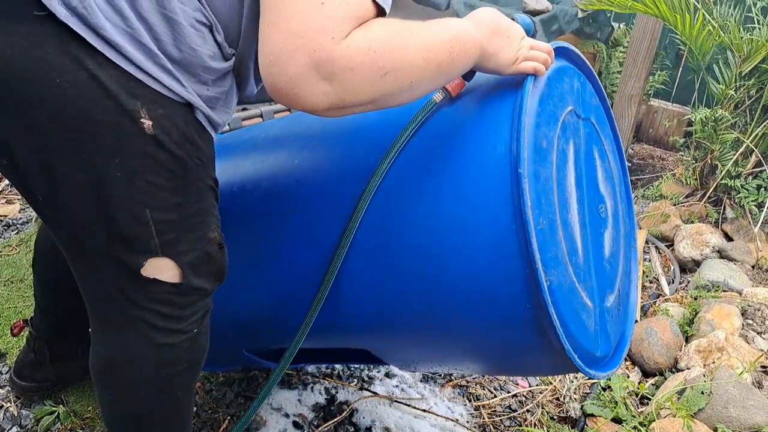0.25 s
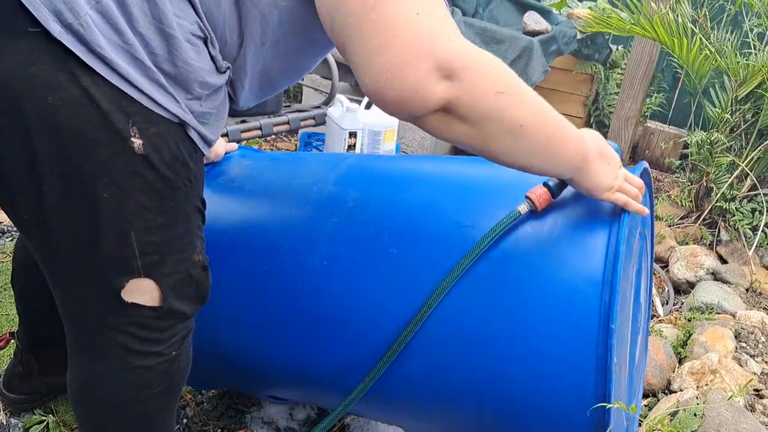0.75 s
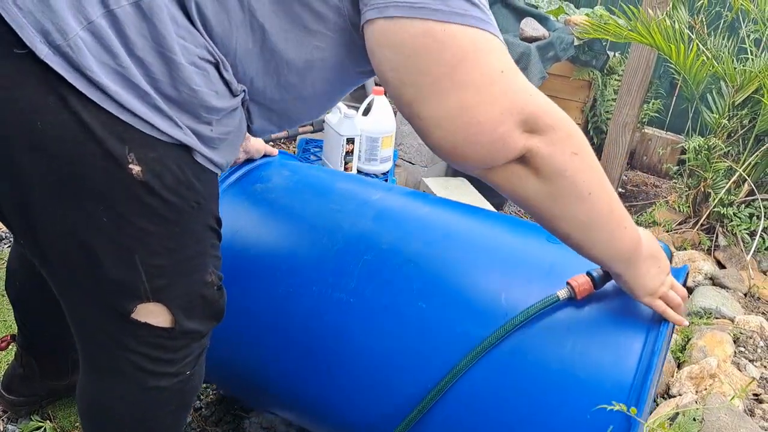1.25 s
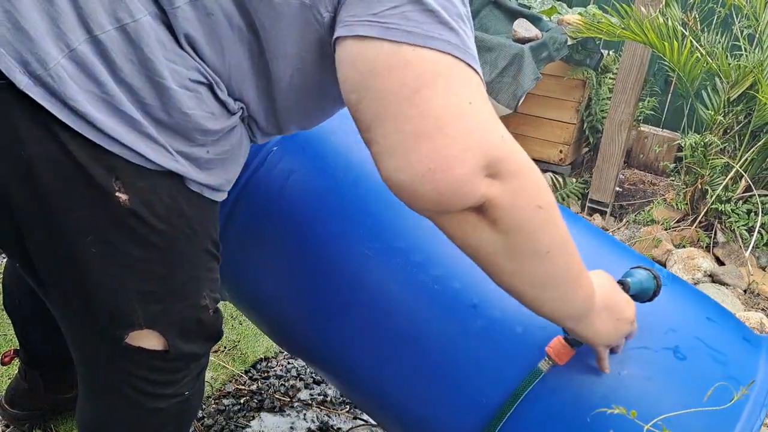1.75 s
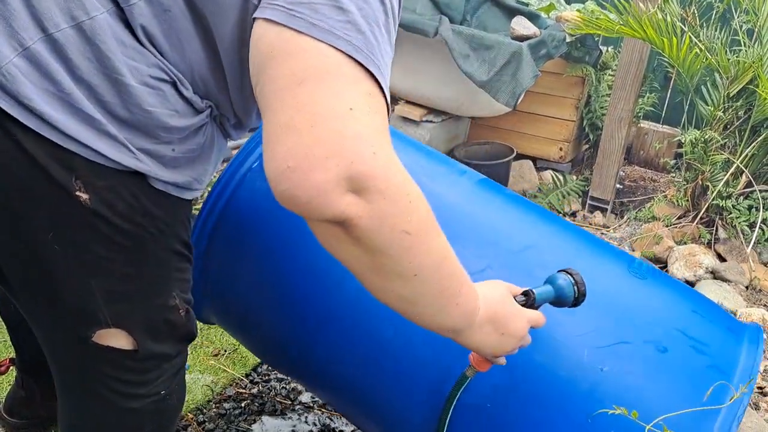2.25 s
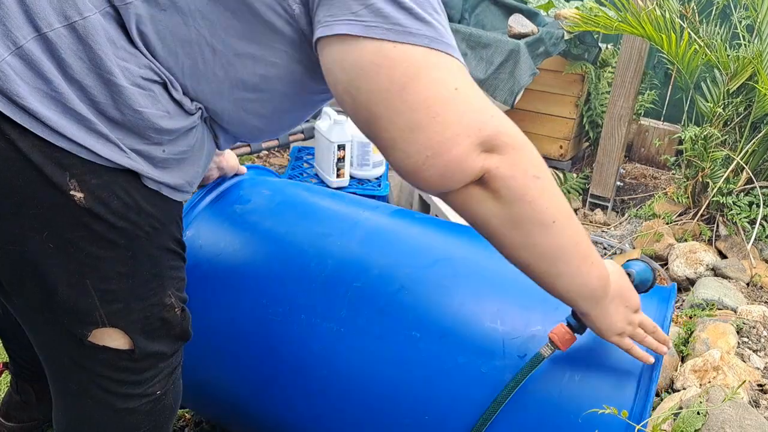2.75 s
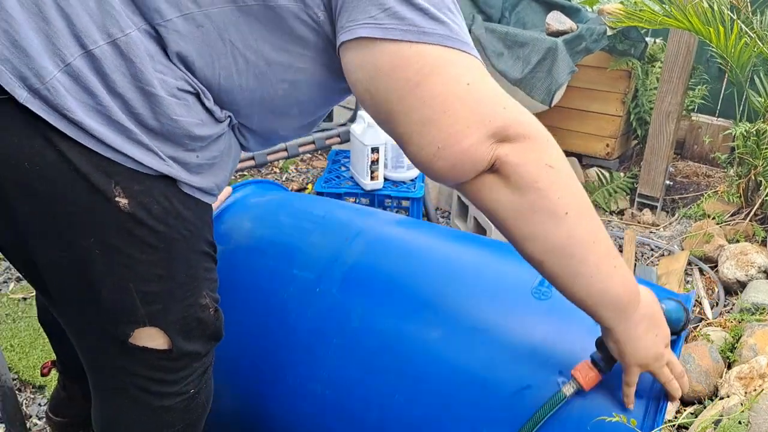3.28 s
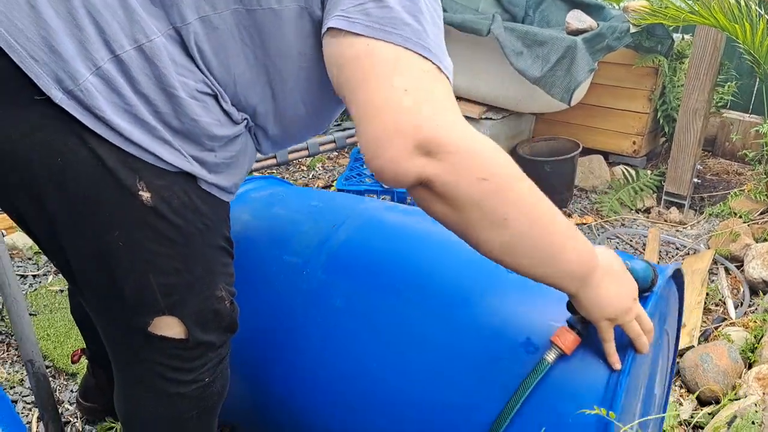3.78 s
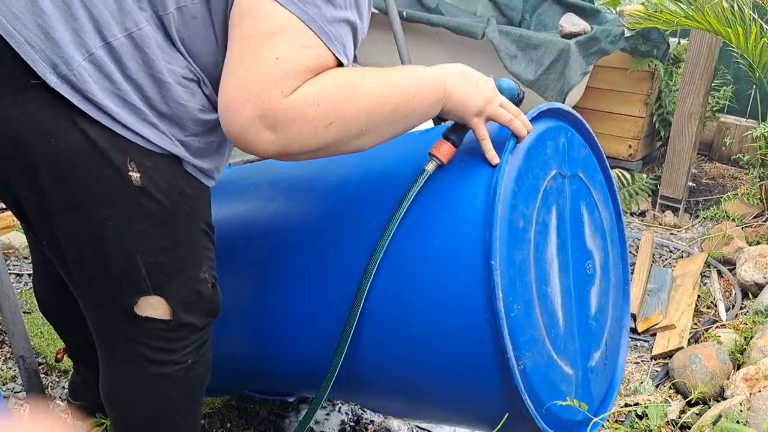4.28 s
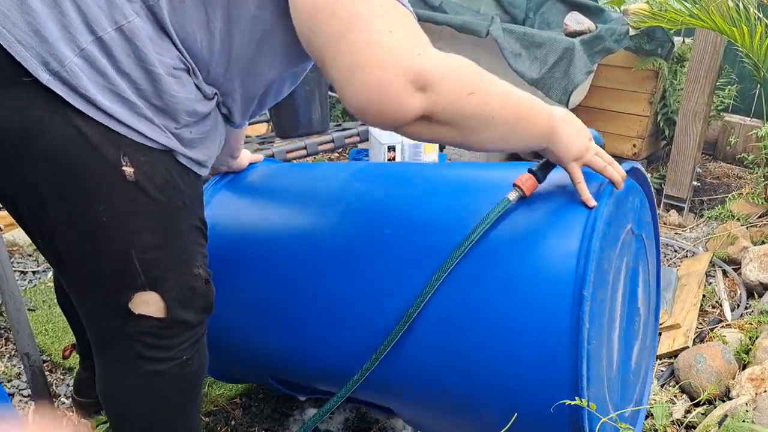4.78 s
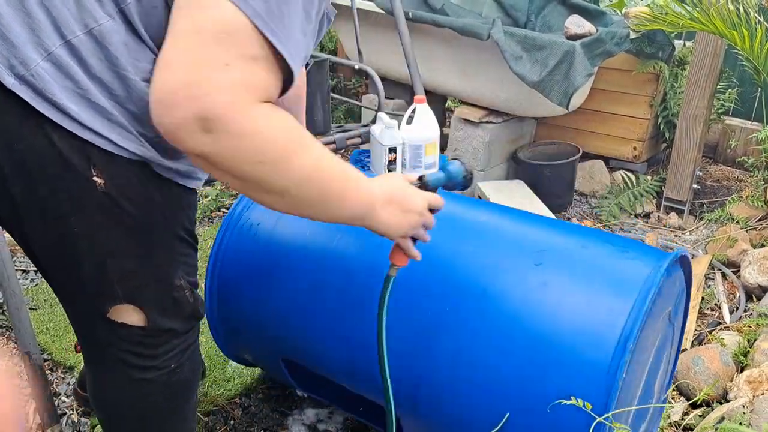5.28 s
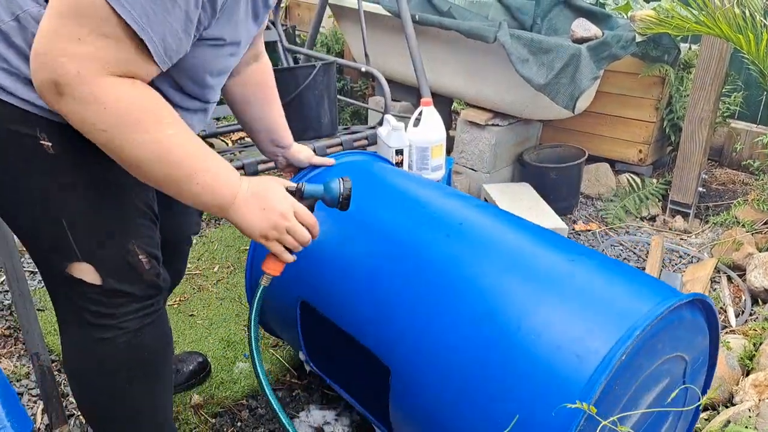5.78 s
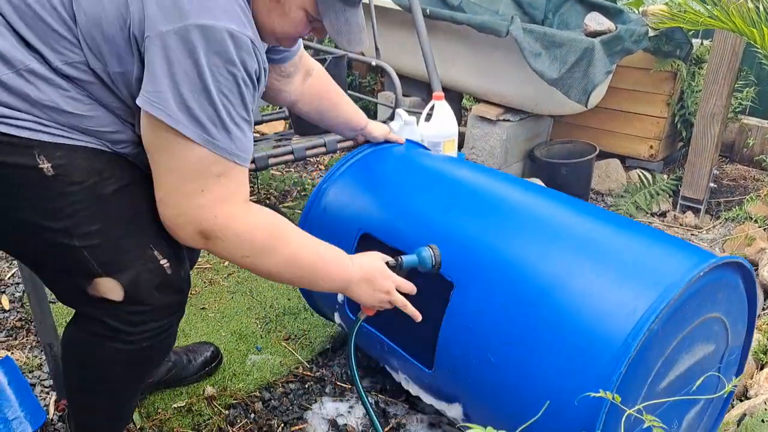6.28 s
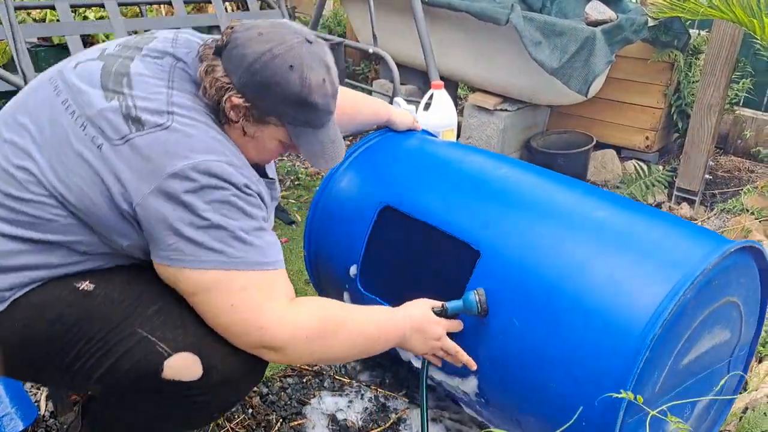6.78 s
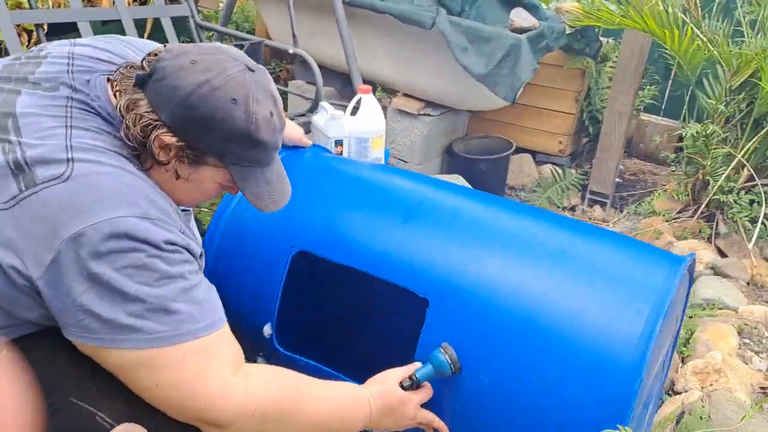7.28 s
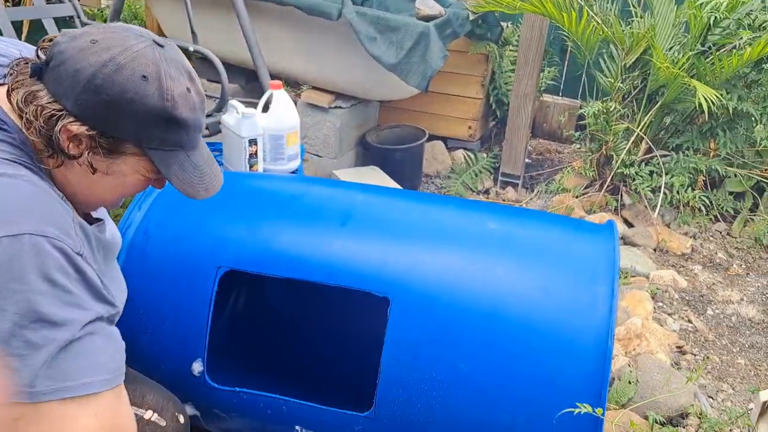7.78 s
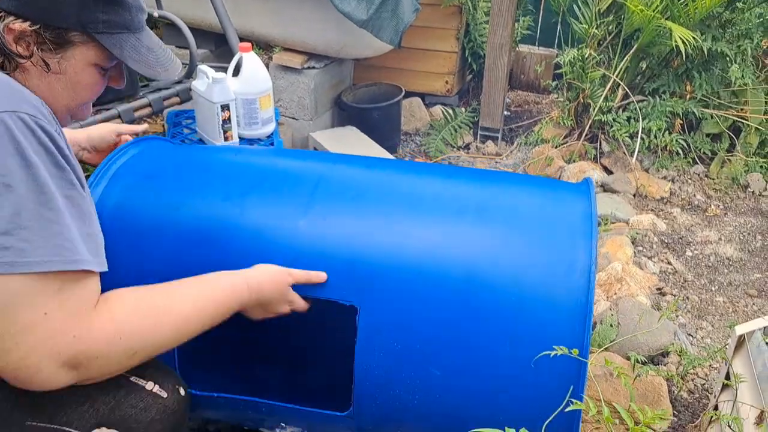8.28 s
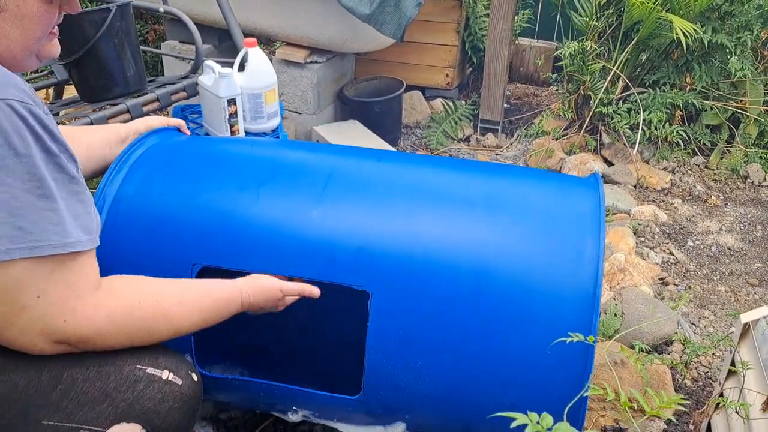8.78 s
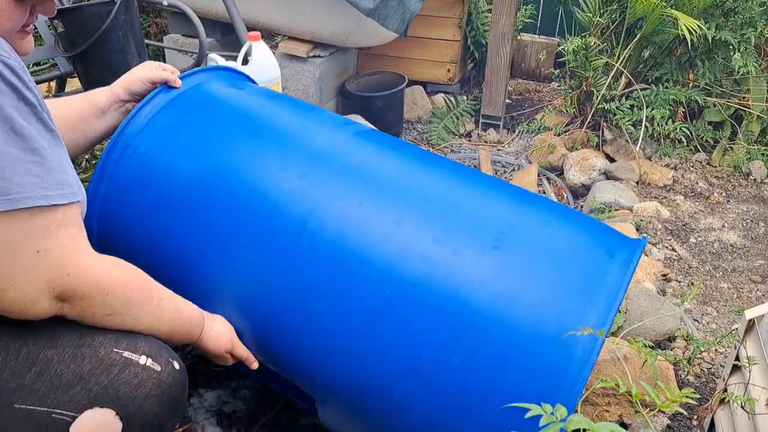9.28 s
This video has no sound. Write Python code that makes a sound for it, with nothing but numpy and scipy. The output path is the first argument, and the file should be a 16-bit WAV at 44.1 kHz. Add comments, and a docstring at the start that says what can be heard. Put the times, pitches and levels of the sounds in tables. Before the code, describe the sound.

Outdoors and close by, water washes around inside a plastic barrel as it is tilted, with deep throbbing booms, hollow knocks and gritty clicks.

```python
"""A big plastic drum with some rinse water in it is rocked and rolled over stony ground in a garden, a metre away.
Its wall and the air inside are paired decaying tones that beat against each other as booms.
Blows by water, hands, rim and hose nozzle are short rattles of noise that ring the hollow shell.
Water is made of tiny impacts, rising bubble tones and gliding notes; grit and clicks are scattered noise.
A faint garden hush lies behind it all."""
import sys
import numpy as np
from scipy import signal
from scipy.fft import rfft, irfft
from scipy.io import wavfile
from scipy.ndimage import uniform_filter1d, minimum_filter1d

SR = 44100
rng = np.random.default_rng(int(sys.argv[2]) if len(sys.argv) > 2 else 0)


def persist_wave(psi):
    """Save psi, clipped to +-1, as 16-bit WAV."""
    counts = np.round(np.clip(psi, -1, 1) * 32767).astype(np.int16)
    wavfile.write(sys.argv[1], SR, np.atleast_2d(counts).T)


N = 420713  # length of the scene in samples

# All table levels are relative, before each sound is mixed.
# the drum drops or the water hits its end: (t/s, level/dB, f/Hz of the air inside)
BOOMS = [(0.161, -27.5, 62.4), (1.199, -1.5, 66.3), (1.461, -7.5, 61.9), (1.823, -24.5, 74.3),
         (3.433, 4, 68), (5.212, -9, 72.5), (5.73, -26.5, 76), (6.429, -31, 79.7), (6.507, -26.5, 79.7),
         (7.564, -29, 79.7), (8.307, -8, 72.8), (8.842, -26, 78.2), (8.989, -18, 78.8), (9.179, -4.5, 75.4)]
# bending modes of the drum that every boom also sets off: (f/Hz, level/dB, t60/s)
BENDING = [(95, -16, 0.38), (128.5, -21, 0.48), (139.8, -24, 0.26)]
# the wall's lowest mode shifts as the drum rolls and the water loads it: (t/s, f/Hz, level against the air/dB)
WALL_MODE = [(0, 55.5, -12), (1.3, 52.5, -3), (3.4, 49.2, -9.5), (5.2, 56.4, -7), (6.5, 56.4, 8.5),
             (8.3, 56.95, 3.5), (9.2, 60.6, -4)]
# resonances of the hollow drum: (f/Hz, level/dB, t60/s)
HOLLOW_MODES = [(98.5, 3.5, 0.49), (134, -12, 0.29), (139.3, 4.5, 0.17), (196, 7.5, 0.39),
                (221.3, 2.5, 0.93), (242, 2.5, 0.39), (301.8, 8.5, 0.13), (328.4, 5, 0.26),
                (378.9, 5.5, 0.25), (426, 6, 0.75), (441, -24, 1), (520, -15, 0.19), (557, 0.5, 0.23),
                (595, -9.5, 0.1), (646.3, 1.5, 0.092), (655, -11, 0.68), (759, 3.5, 0.095),
                (762.4, 2.5, 0.12), (825, -52, 0.75), (881, -6, 1), (1084, 1, 0.21), (1173, -5, 0.073),
                (1310, 1.5, 0.18), (1440, 4, 0.6)]
# dull answer of the damped plastic wall: (f/Hz, level/dB)
WALL_COLOUR = [(70, -14), (140, 13.0), (400, -1.5), (780, 12.5), (920, -5.5), (2500, -52), (8000, -80)]
# blows of water and hands on the shell:
# (t/s, level/dB, thud f/Hz, crack level/dB, top of the crack f/Hz, decay time of the rattle/s)
KNOCKS = [(0.157, -26.5, 330, -16, 7000, 0.039), (0.416, -31, 438, -15, 5300, 0.028),
          (0.597, -29.5, 766, -15.5, 7000, 0.049), (1.195, -10, 425, -16.5, 1510, 0.036),
          (1.455, -6, 765, -12.5, 7000, 0.018), (1.463, -5, 606, -7, 12000, 0.023),
          (1.474, -8.5, 313, -17, 3000, 0.03), (1.53, -21.5, 303, -4, 2500, 0.042),
          (1.82, -31.5, 473, -14.5, 8900, 0.02), (2.756, -34, 590, -11, 5000, .012),
          (2.832, -26.5, 326, -10, 5000, 0.045), (3.357, -23.5, 660, -2.5, 5230, 0.014),
          (3.427, -12, 353, -24, 6000, 0.05), (3.488, -15, 436, -17, 6100, 0.042),
          (3.643, -28, 420, -15, 9000, 0.047), (3.841, -26, 440, -5.5, 9000, 0.043),
          (4.515, -37, 360, -45, 9000, 0.027), (5.21, -5.5, 268, -14, 1700, 0.035),
          (5.339, -21.5, 208, -14.5, 6400, 0.029), (5.683, -8, 331, -16, 9000, 0.02),
          (5.945, -24.5, 306, -10.5, 9100, 0.014), (6.113, -18.5, 220, -10.5, 9000, 0.056),
          (6.231, -14, 316, -17, 9000, 0.0095), (6.506, -31.5, 338, -6.5, 9000, 0.013),
          (6.64, -18.5, 745, -16, 9000, 0.0068), (6.743, -19.5, 169, -34, 9000, 0.022),
          (6.88, -16, 264, -19, 6900, 0.014), (7.162, -29.5, 220, -37, 9000, 0.21),
          (7.466, -18, 780, -13.5, 6300, 0.058), (7.526, -15, 770, -9.5, 6900, 0.14),
          (7.562, -12, 780, -19, 4200, .025), (8.262, -29, 382, -12, 8700, .052),
          (8.307, -13, 159.5, -16.5, 9000, 0.063), (8.612, -18.5, 220, -19.5, 9000, 0.022),
          (8.999, -28, 775, -17, 3800, 0.014), (9.123, -15, 760, -9.5, 5700, .015),
          (9.17, -10.5, 270, -39, 9000, 0.017), (9.186, -10, 139, -35, 3000, .02),
          (9.214, -13, 730, -15, 9000, 0.017), (9.31, -20, 316, -23, 9000, 0.034)]
# each tilt sends a wave along the drum: (crest t/s, slosh level/dB, splash level/dB, rise/s, fall/s)
WAVES = [(0.08, -44, -69, 0.21, 0.14), (0.38, -47, -48.5, 0.48, 0.26), (0.72, -45.5, -48.5, 0.14, 0.32),
         (1.18, -40, -44.5, 0.066, 0.072), (1.48, -33, -43.5, 0.11, 0.19), (1.93, -46, -53.5, 0.081, 0.09),
         (2.52, -44, -44, 0.13, 0.64), (2.82, -39, -56, 0.18, 0.081), (3.14, -46.5, -48.5, 0.36, 0.36),
         (3.45, -26, -38.5, 0.19, 0.095), (3.86, -39.5, -55, 0.15, .08), (4.2, -49, -57, .6, 0.98),
         (5.05, -43.5, -49.5, 0.27, 0.32), (5.58, -32.5, -46.5, 0.22, 0.22),
         (5.694, -25, -33.5, 0.056, 0.13), (6.17, -29, -41.5, 0.18, 0.19), (6.74, -38, -46.5, 0.25, 0.35),
         (6.922, -35.5, -40.5, 0.034, 0.051), (7.34, -37, -43.5, 0.24, 0.2), (7.56, -16, -25, 0.067, 0.073),
         (7.88, -49.5, -49, .12, 0.26), (8.347, -24, -38, 0.12, 0.07), (8.59, -32.5, -47, 0.13, 0.11),
         (8.96, -34, -49.5, 0.12, 0.096), (9.18, -24.5, -40, 0.09, 0.16)]
# colour of water breaking up inside the drum, also used for the cracks: (f/Hz, level/dB)
SPLASH_COLOUR = [(400, 0), (900, -4.5), (1300, 0.5), (2000, -0.5), (2700, -1), (3300, -8), (5000, -2),
                 (7000, -11), (12000, -17.5), (16000, -35)]
# a sheet of water runs along the wall and its hollow note sinks:
# (start t/s, length/s, level/dB, first f/Hz, last f/Hz)
RUNS = [(0.269, 0.39, -48, 1900, 1303), (2.349, 0.39, -46, 2556, 1495), (3.834, .14, -48, 2130, 1734),
        (4.64, 0.43, -53, 2205, 1800)]
# colour of the low rumble: (f/Hz, level/dB)
RUMBLE_COLOUR = [(20, -21), (40, -13.5), (54, 0.5), (76, -2.5), (90, -5.5), (130, -10.5), (250, -18), (1000, -115)]
# a boot or the rim grinds into the gravel: (peak t/s, level/dB, rise/s, fall/s)
CRUNCHES = [(0.25, -49, .25, 0.47), (1.21, -45, .02, 0.027), (3.4, -33.5, 0.015, 0.077),
            (5.32, -39, 0.031, .05), (5.64, -37.5, 0.15, 0.37), (5.69, -27.5, 0.043, 0.0081),
            (5.955, -25.5, 0.036, 0.09), (6.13, -19, .035, 0.045), (6.26, -40.5, 0.068, 0.2),
            (6.62, -39.5, 0.13, 0.18), (6.92, -39.5, .05, 0.13), (7.45, -41, 0.36, .55),
            (8.32, -26.5, 0.013, 0.041)]
# colour of grit under the rim and the boots: (f/Hz, level/dB)
GRIT_COLOUR = [(800, -43), (2500, -6.5), (4800, 0), (6200, 2.5), (8000, 2), (10500, -2), (12400, 3),
               (14000, -4), (16000, -7.5)]
# stones and hard plastic click: (t/s, level/dB, extra brightness/dB)
CLICKS = [(1.997, -35, -14), (2.868, -31.5, -10), (2.998, -28, -26), (3.357, -27.5, -22),
          (3.516, -26.5, -14), (3.842, -25.5, -31), (5.688, -24.5, 13), (5.865, -25.5, -8), (6.05, -23, -1),
          (6.076, -24, 9.5), (6.233, -12.5, -1), (6.358, -38, 11.5), (6.556, -28.5, -9), (6.642, -28, 0),
          (7.925, -35, 4), (8.161, -17.5, 5), (8.212, -23.5, -14), (8.306, -21, 2), (8.481, -29, -7),
          (9.126, -37, 9), (9.218, -27, -4)]
# colour of a click's main sound and of its bright edge: (f/Hz, level/dB)
CLICK_BODY = [(500, -3), (1500, -5.5), (3200, -12), (5200, 3), (7500, -1.5), (12000, -38)]
CLICK_EDGE = [(3000, -6), (7000, -8), (10500, -3.0), (12400, 1.0), (16000, -20.0)]
# colour of the garden hush: (f/Hz, level/dB)
GARDEN_COLOUR = [(15, 13.5), (30, -13.5), (59, 13.5), (150, -2), (350, -10), (650, -18), (1050, -35),
                 (1600, -56), (2200, -20), (3400, -22.5), (5200, -20), (9000, -31.5), (12000, -28.5),
                 (16000, -49)]
# the two microphones differ in colour: (f/Hz, left minus right level/dB)
MICROPHONES = [(100, 0.2), (280, 1.1), (560, -4), (1050, 4.5), (2000, 1.5), (4000, -6), (8000, 2.5),
               (12000, 3.5)]

BOOM_T60_S, BOOM_DAMPING_S_PER_DB = 0.59, 0.01  # ring of a 0 dB boom; harder ones die sooner
CALM_SLOSH_DB, CALM_SPLASH_DB = -68, -57  # the water between waves
SWELL_SHAPE = 1.61  # 1 gives a pointed crest, 2 a round one
GRIT_REST_DB, GRIT_FOLLOW = -32.5, 0.38  # stirred grit: level at 0 dB slosh, dB per dB of slosh
GARDEN_DB = -43.5  # before the trim and the slow wander in garden()
TOP_HZ = 15900  # upper limit of the whole sound


def booms(rise_s=0.0048):
    """Wall and air swing against each other at nearby pitches, so each boom swells and then throbs."""
    out, t = np.zeros(N), seconds(1)
    bending = np.zeros(len(t))
    for hz, db, t60 in BENDING:
        bending += undb(db) * np.sin(2 * np.pi * hz * t) * fade(t, t60)
    when, wall_pitches, wall_levels = np.transpose(WALL_MODE)
    for s, db, air_hz in BOOMS:
        wall_hz = np.interp(s, when, wall_pitches)
        wall_db = np.interp(s, when, wall_levels)
        t60 = BOOM_T60_S - BOOM_DAMPING_S_PER_DB * db
        air = np.sin(2 * np.pi * air_hz * t)
        wall = undb(wall_db) * np.sin(2 * np.pi * wall_hz * t)
        boom = (air - wall) * fade(t, t60) + bending
        add(out, s, undb(db) * boom * (1 - np.exp(-t / rise_s)))
    return out


def hollow(x, width=0.92, right_db=7, wall_db=-8):
    """The drum's resonances; higher ones reach each microphone with their own phase and strength."""
    t = seconds(0.6)
    response = np.zeros((2, len(t)))
    for k, (hz, db, t60) in enumerate(HOLLOW_MODES):
        apart = np.array([[-1], [1]]) * min(hz / 800, 1) ** 1.7
        phase = 2 * np.pi * hz * t + (-1) ** k * width * apart
        # dividing by t60 gives long rings a gentler start
        response += undb(db + right_db * apart / 2) / t60 * fade(t, t60) * np.cos(phase)
    wall = ring(x, colour(WALL_COLOUR))
    return passband(ring(x, response) + undb(wall_db) * wall, 1135)


def knocks(body_db=-6, thud_db=-6.0, crack_db=-6, echo_db=-1.0, first_blow=5, cycles=12):
    """A push and a short rattle make the struck patch thud, the hollow ring and the shell crack and echo."""
    push, thuds, crack = np.zeros(N), np.zeros(N), np.zeros((2, N))
    t = seconds(0.3)
    rattle = grains(rate=5000, spread_db=1.0)
    crackle = spread(rattle, t60=0.015, right_db=8.0, alike=0.41)
    for s, db, hz, sharp_db, top_hz, length in KNOCKS:
        start = rng.integers(N - len(t))
        part = slice(start, start + len(t))
        dying = np.exp(-t / length) * (1 - t / t[-1])
        blow = rattle[part] * dying
        blow[0] += first_blow
        patch = ring(blow, np.sin(2 * np.pi * hz * t) * fade(t, cycles / hz))[0]
        # give the thud the same energy as its blow
        patch *= np.linalg.norm(blow) / np.linalg.norm(patch)
        add(thuds, s, undb(db + thud_db) * patch)
        # a stiff patch gives little bass, a soft contact little top
        stiff = passband(blow, 0.41 * hz, "high", order=2)
        add(push, s, undb(db) * passband(stiff, 0.14 * top_hz, order=2))
        add(crack, s, undb(db + sharp_db) * passband(crackle[:, part] * dying, top_hz))
    # only the middle of the crack lingers inside the drum
    echo = inside(crack[0], t60=0.3)
    shell = undb(crack_db) * ring(crack, colour(SPLASH_COLOUR)) + undb(echo_db) * echo
    return undb(body_db) * hollow(push) + passband(thuds, 990) + shell


def inside(x, t60, right_db=4):
    """The crowded upper air modes of the drum ring on between about 1 and 3 kHz."""
    t = seconds(0.6)
    tail = rng.standard_normal((2, len(t))) * fade(t, t60)
    modes = passband(passband(tail, 2630, order=6), 1220, "high")
    return ring(x, modes * undb(np.array([[-right_db], [right_db]]) / 2))


def water(slosh_db, splash_db, slap_db=-3, gurgle_db=-5, spray_db=-1, echo_db=-7):
    """Slaps ring the hollow, bubbles gurgle, and drops patter on the inner wall."""
    slaps = hollow(undb(slosh_db + 2 * walk(30)) * grains(rate=700, spread_db=0.0))
    gurgle = undb(slosh_db) * bubbles()
    drops = undb(splash_db + 2 * walk(40)) * grains(rate=1700, spread_db=4.5)
    scattered = spread(drops, t60=0.035, right_db=4.5, alike=0.04)
    spray = passband(ring(scattered, colour(SPLASH_COLOUR)), 5900, order=2)
    echo = inside(drops, t60=0.54)
    near = undb(slap_db) * slaps + undb(gurgle_db) * gurgle
    return near + undb(spray_db) * spray + undb(echo_db) * echo


def bubbles(count=900, low_hz=230, high_hz=800, cycles=8, glide=0.19):
    """Trapped air pockets ring for a few cycles and rise in pitch."""
    out, t = np.zeros(N), seconds(0.15)
    for when, size, strength in rng.random((count, 3)):
        hz = low_hz * (high_hz / low_hz) ** size
        age = t * hz / cycles
        rise = 1 + glide * np.minimum(age, 2) / 2
        tone = np.exp(-2 * age) * np.sin(2 * np.pi * hz * t * rise)
        add(out, when * N / SR, undb(9.0 * strength ** 2) * tone)
    return unit(out)


def runs(width_hz=460, attack_s=0.037, release_s=0.024, right_db=5, hiss_db=-5):
    """Fine drops sound through a resonance that glides as the sheet of water spreads, with hiss above."""
    out = np.zeros((2, N))
    patter = undb(5 * walk(35)) * grains(rate=670, spread_db=-0.5)
    drops = spread(patter, t60=0.034, right_db=right_db, alike=0.18)
    # a slow complex noise, later moved up to the gliding pitch; the reversed drops fill its second part
    note = unit(passband(drops + 1j * drops[:, ::-1], width_hz, order=2))
    hiss = unit(passband(passband(drops, 3000, "high"), 5000))
    for s, length, db, first_hz, last_hz in RUNS:
        t = seconds(length)
        part = slice(int(s * SR), int(s * SR) + len(t))
        pitch = first_hz * (last_hz / first_hz) ** (t / length)
        phase = 2 * np.pi * np.cumsum(pitch) / SR
        gliding = np.sqrt(2) * np.real(note[:, part] * np.exp(1j * phase))
        sheet = gliding + undb(hiss_db) * hiss[:, part]
        edges = np.minimum(1, np.minimum(t / attack_s, (length - t) / release_s))
        add(out, s, undb(db) * sheet * edges)
    return out


def rumble(slosh_db, follow=0.61, rumble_db=-19):
    """The shifting water keeps the lowest resonances stirring."""
    stir = undb(rumble_db + follow * slosh_db) * rng.standard_normal(N)
    return ring(stir, colour(RUMBLE_COLOUR))


def grit(grit_db, crunch_db=-7.5):
    """Small stones grind in dense clusters of clicks."""
    stones = undb(grit_db + crunch_db + 2 * walk(60)) * grains(rate=800, spread_db=2.0)
    return ring(spread(stones, t60=0.038, right_db=5.5, alike=0.79), colour(GRIT_COLOUR))


def clicks(click_db=-4, snap_s=0.0023, tail_db=-4, right_db=6):
    """A hard contact snaps for a few milliseconds and scatters off the drum and the ground."""
    body, edge, t = np.zeros(N), np.zeros(N), seconds(0.05)
    for s, db, bright_db in CLICKS:
        snap = undb(db + click_db) * np.exp(-t / snap_s)
        add(body, s, snap)
        add(edge, s, undb(bright_db) * snap)
    out = np.zeros((2, N))
    for x, points in [(body, CLICK_BODY), (edge, CLICK_EDGE)]:
        direct = spread(x, t60=0.002, right_db=right_db, alike=0.34)
        tail = spread(x, t60=0.14, right_db=right_db, alike=0.84)
        out += ring(direct + undb(tail_db) * tail, colour(points))
    return out


def garden(air_db=-2, width=0.19):
    """Faint outdoor hush: nearly alike on both sides in the bass, wider in the treble."""
    mid, side = ring(rng.standard_normal((2, N)), colour(GARDEN_COLOUR))
    side = passband(side, 270, "high", order=1)
    level = undb(GARDEN_DB + air_db + walk(1.91))
    return level * (mid + width * side * np.array([[1], [-1]]))


def undb(db):
    """Turn decibels into gain."""
    return 10 ** (np.asarray(db) / 20)


def unit(x):
    """Scale to an average (rms) strength of 1."""
    return x / np.sqrt(np.mean(np.abs(x) ** 2))


def seconds(length):
    """Time axis of a given length in seconds."""
    return np.arange(int(length * SR)) / SR


def fade(t, t60):
    """Exponential decay, 60 dB down at t60."""
    return np.exp(-np.log(1000) * t / t60)


def add(out, s, x):
    """Mix a sound in at time s."""
    i = max(int(s * SR), 0)
    out[..., i:i + x.shape[-1]] += x[..., :N - i]


def ring(x, response):
    """Let every instant of a sound set off a response, scaled to unit energy."""
    response = np.atleast_2d(response)
    energy = np.mean(np.sum(response ** 2, axis=1))
    return signal.fftconvolve(np.atleast_2d(x), response / np.sqrt(energy), axes=1)[:, :N]


def colour(points, size=4096):
    """Response with a spectrum of (f/Hz, level/dB) points that never starts before its cause."""
    hz, db = np.transpose(points)
    bins_hz = np.arange(size // 2 + 1) * SR / size
    gain = undb(np.interp(np.log(bins_hz + 1), np.log(hz), db))
    # folding the cepstrum (the spectrum of the log gain) puts all the sound after time zero
    cepstrum = irfft(np.log(gain))
    cepstrum[1:size // 2] *= 2
    cepstrum[size // 2 + 1:] = 0
    return irfft(np.exp(rfft(cepstrum)))


def passband(x, hz, kind="low", order=3):
    """Keep what lies below (or above) hz."""
    sos = signal.butter(order, min(hz, 0.45 * SR), kind, fs=SR, output="sos")
    return signal.sosfilt(sos, x)


def walk(rate):
    """Random wander of spread near 1, in straight steps between rate points per second."""
    knots = rng.standard_normal(int(N / SR * rate) + 2)
    return np.interp(np.arange(N) / SR * rate, np.arange(len(knots)), knots)


def grains(rate, spread_db):
    """Random tiny impacts, rate per second on average, with sizes spread in dB; rms 1."""
    chance = rng.random(N)
    size = np.minimum(rng.exponential(size=N), np.pi)
    sign = rng.choice([-1, 1], N)
    return unit((chance < rate / SR) * sign * undb(spread_db * size))


def spread(x, t60, right_db, alike):
    """Every impact becomes a dying burst of scattered sound, partly shared by the two microphones."""
    keep = fade(1 / SR, t60) ** 2
    power = signal.lfilter([1 - keep], [1, -keep], x ** 2 + 1e-18)
    shared, share = rng.standard_normal(N), np.clip(alike, 0, 1)
    noise = np.sqrt(share) * shared + np.sqrt(1 - share) * rng.standard_normal((2, N))
    return np.sqrt(power) * noise * undb(np.array([[-right_db], [right_db]]) / 2)


def swells(events):
    """Add the power of (t/s, level/dB, rise/s, fall/s) swells; gives dB over time."""
    power = np.full(N, 1e-12)
    t = np.arange(N) / SR
    for s, db, rise, fall in events:
        near = slice(*np.searchsorted(t, [s - np.pi * rise, s + np.pi * fall]))
        away = np.maximum((s - t[near]) / rise, (t[near] - s) / fall)
        power[near] += (undb(db) * np.exp(-away ** SWELL_SHAPE)) ** 2
    return 10 * np.log10(power)


def together(a_db, b_db):
    """Level of two unrelated sounds at once."""
    return 20 * np.log10(np.hypot(undb(a_db), undb(b_db)))


def microphone_colour(x):
    """Give each microphone its own colour."""
    hz, db = np.transpose(MICROPHONES)
    bins_hz = np.arange(N // 2 + 1) * SR / N
    apart = np.interp(np.log(bins_hz + 1), np.log(hz), db)
    return irfft(rfft(x) * undb(np.array([apart, -apart]) / 2), N)


def scene():
    """The drum, its water and the ground under it, in the garden."""
    slosh_waves = swells((s, db, rise, fall) for s, db, _, rise, fall in WAVES)
    splash_waves = swells((s, db, rise, fall) for s, _, db, rise, fall in WAVES)
    slosh_db = together(CALM_SLOSH_DB, slosh_waves)
    splash_db = together(CALM_SPLASH_DB, splash_waves)
    # the rocking drum stirs the grit
    grit_db = together(GRIT_REST_DB + GRIT_FOLLOW * slosh_db, swells(CRUNCHES))
    drum = booms() + knocks()
    wet = water(slosh_db, splash_db) + runs() + rumble(slosh_db)
    ground = grit(grit_db) + clicks()
    return drum + wet + ground + garden()


def record(dry, ceiling=0.86, left_hz=17, right_hz=9):
    """Two microphones with unequal bass roll-off; a limiter turns the loudest peaks down, and the top is cut."""
    left, right = microphone_colour(dry)
    left = passband(left, left_hz, "high", order=1)
    right = passband(right, right_hz, "high", order=1)
    heard = np.array([left, right])
    size = 700  # samples over which the limiter holds and smooths its gain
    needed = np.minimum(1, ceiling / (np.abs(heard).max(axis=0) + 1e-9))
    gain = uniform_filter1d(minimum_filter1d(needed, size), size)
    top_cut = signal.ellip(10, 0.2, 80, TOP_HZ, fs=SR, output="sos")
    return signal.sosfilt(top_cut, heard * gain)


dry = scene()
out = record(dry)
persist_wave(out)
```